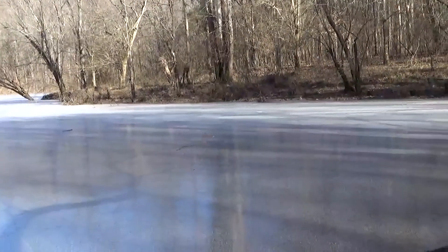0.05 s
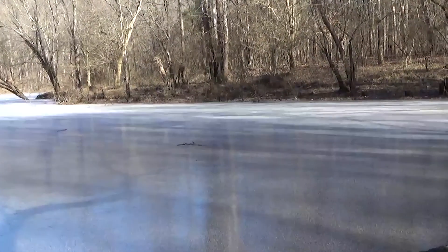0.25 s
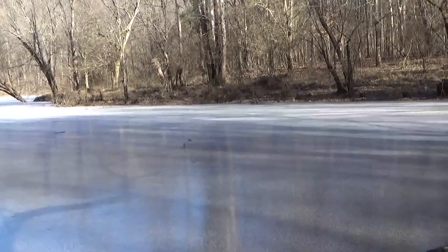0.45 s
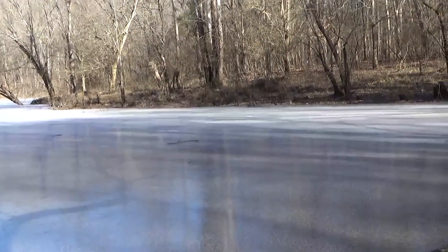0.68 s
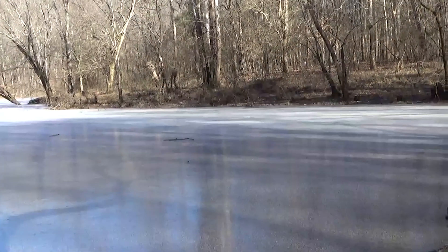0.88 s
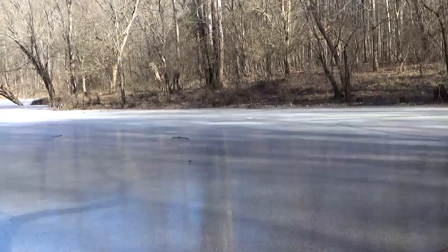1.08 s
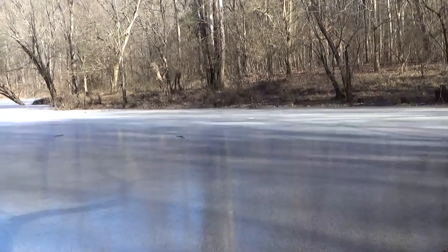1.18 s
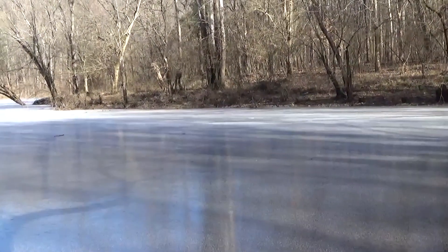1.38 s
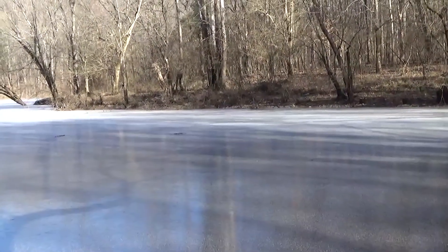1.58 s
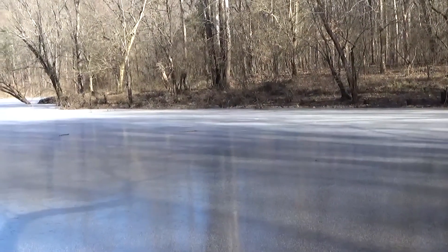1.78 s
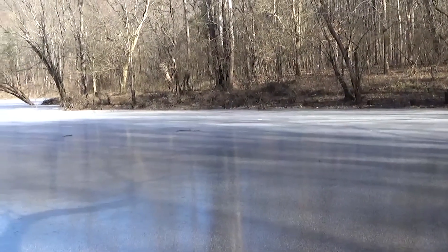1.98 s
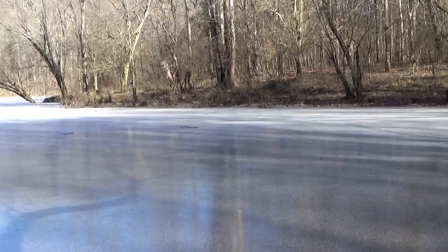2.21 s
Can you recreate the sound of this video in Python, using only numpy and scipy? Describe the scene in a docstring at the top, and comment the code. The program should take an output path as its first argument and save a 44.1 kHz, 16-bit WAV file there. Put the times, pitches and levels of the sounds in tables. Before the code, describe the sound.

Quick downward chirps ring from pond ice as a thrown stick bounces and slides.

```python
"""Light wind in bare woods. A stick thrown onto a frozen pond scrapes, ticks and skips a few times.
Each blow sends bending waves through the sheet: highs outrun lows, so a falling chirp arrives just
before the knock and tick that come through the air, and the sheet rings on at one note. The stick
rings briefly now and then. It slides away over frost with a fine icy hiss, and a faint bird whistles."""
import sys
import numpy as np
from scipy import signal
from scipy.fft import rfft, irfft, next_fast_len
from scipy.io import wavfile
from scipy.ndimage import map_coordinates

SR = 44100
rng = np.random.default_rng(int(sys.argv[2]) if len(sys.argv) > 2 else 0)


def master(y):
    """Save y as 16-bit WAV."""
    cut = np.clip(np.atleast_2d(y).T, -1, 1)
    pcm = np.round(cut * 32767)  # scale
    wavfile.write(sys.argv[1], SR, pcm.astype(np.int16))


N = 99225

# Skips: knock_s, level_db, lead_s, sweep_bend, knock_db, forerunner_db, other_end_delay_s, other_end_db
SKIPS = [(0.2501, -1.5, 0.018, 1.11, 1, -2, .027, -13), (.3740, -12, 0.018, 0.76, -5.5, -3, 0.013, -5.5),
         (0.533, -16, .022, 1.15, -46, -18, .011, -14), (0.585, -20.5, 0.027, 0.63, 4.5, -3, .010, -9),
         (0.693, -21, 0.026, 1.145, -9, -8, 0.007, -4), (.8335, -28, 0.031, 0.92, -5, -6, 0.016, -9)]
# Light blows that just set the sheet chirping: knock_s, level_db
NUDGES = [(0.057, -43.5), (.090, -43), (.136, -45.5), (0.952, -40), (1.245, -44), (1.359, -45),
          (1.640, -47.5), (1.885, -48), (1.926, -43), (2.031, -48)]
# Spectrum of chipped ice: freq_hz, gain_db
ICE_SPECTRUM = [(1000, -80), (4000, -16), (6500, -12.5), (8200, -1.5), (9500, 1.5), (11000, -2)]


def amp(db):
    return 10 ** (np.asarray(db) / 20)


def unit_rms(x):
    return x / np.sqrt(np.mean(x ** 2) + 1e-20)


def time_s():
    return np.arange(N) / SR


def freq_hz():
    """Bins of the padded spectrum."""
    return np.fft.rfftfreq(2 * next_fast_len(N * 3 // 4), 1 / SR)


def colour(points):
    """Gain per bin from (freq_hz, gain_db) points on a log axis."""
    hz, db = np.transpose(points)
    return amp(np.interp(np.log(freq_hz() + 1), np.log(hz), db))


def filtered(x, gain):
    return irfft(rfft(x, 2 * (len(gain) - 1)) * gain)[..., :N]


def noise(gain):
    """Coloured noise, rms 1."""
    return unit_rms(filtered(rng.standard_normal(N), gain))


def wobble(rate_hz):
    """Smooth random curve with knots at rate_hz."""
    return map_coordinates(rng.standard_normal(1024), [time_s() * rate_hz], mode="wrap")


def decay(start_s, t60_s, rise_s):
    age_s = np.maximum(time_s() - start_s, 0)
    return (1 - np.exp(-age_s / rise_s)) * np.exp(-np.log(1000) * age_s / t60_s)


def stereo(mid, side):
    return np.array([mid + side, mid - side])


def spread(source, side_db):
    """Two independent draws of a source as mid and side."""
    return stereo(source(), amp(side_db) * source())


def wind():
    """Light wind in the woods, wider in the treble."""
    # Wind spectrum: freq_hz, gain_db
    spectrum = [(15, -55), (25, -12.5), (69, 0.5), (134, -1), (202, -1), (247, -2), (518, -10), (979, -12),
                (1360, -13), (1710, -15), (3160, -20), (6120, -24.5), (9440, -18), (11000, -40),
                (14300, -56), (22000, -120)]
    # Stereo width: freq_hz, side_db
    width = [(50, -30), (250, -16), (1000, -4.5), (4000, -1.5), (9500, -6)]
    mid = noise(colour(spectrum))
    side = filtered(noise(colour(spectrum)), colour(width))
    return amp(-49 + 0.1 * wobble(rate_hz=6)) * stereo(mid, side)


def sheet_note(widen=1):
    """Narrow noise at the pitch where bending waves keep step with sound in air."""
    pitch_hz, half_width_hz = 1675, widen * 104
    return noise(1 / (1 + ((freq_hz() - pitch_hz) / half_width_hz) ** 4))


def sheet_murmur():
    """The sheet's faint wavering note, more diffuse than when struck."""
    level_db = -59 + 2 * wobble(rate_hz=35)
    return amp(level_db) * spread(lambda: sheet_note(widen=1.4), side_db=-13)


def grit(gain):
    """Noise with tiny fractures in it, rms about 1."""
    cracks_per_s, crack_share = 900, 0.56
    impulses = (rng.random(N) < cracks_per_s / SR) * rng.standard_normal(N)
    cracks = unit_rms(filtered(impulses, gain))
    return np.sqrt(crack_share) * cracks + np.sqrt(1 - crack_share) * noise(gain)


def slide():
    """The stick chatters over frost: a hiss and a lower rasp."""
    # Course of the slide: at_s, hiss_db, rasp_db
    levels = [(0, -47.5, -48), (.25, -49, -49), (.48, -72, -62), (.65, -75, -56), (.85, -55, -52),
              (.92, -43.5, -56), (.99, -38, -54), (1.07, -41, -47.5), (1.14, -35.5, -44), (1.23, -38, -49),
              (1.255, -41.5, -52), (1.275, -36.5, -49.5), (1.33, -43, -51.5), (1.48, -47, -55),
              (1.6, -48, -55.5), (1.72, -50.5, -54), (2.0, -50.5, -59), (2.25, -50, -77)]
    # Rasp spectrum: freq_hz, gain_db
    rasp_spectrum = [(200, -12), (600, 0.5), (1300, -6), (1700, -1), (2200, -0.5), (2750, 2.5), (3500, -2),
                     (6000, -5), (9000, -8)]
    at_s, hiss_db, rasp_db = np.transpose(levels)
    hiss = amp(np.interp(time_s(), at_s, hiss_db)) * grit(colour(ICE_SPECTRUM))
    rasp = amp(np.interp(time_s(), at_s, rasp_db)) * grit(colour(rasp_spectrum))
    chatter_db = 2.5 * wobble(rate_hz=70)
    return amp(chatter_db) * (hiss + rasp)


def contacts():
    """Gritty ticks and scuffs of wood on ice, heard straight through the air."""
    # Sharp contacts: start_s, level_db, t60_s, wood_db
    ticks = [(0.0443, -41, 0.019, -1), (0.0786, -23, 0.0031, -33), (0.0886, -26, 0.003, -5.5),
             (.1218, -36.5, 0.014, -4), (.2490, -15.5, 0.0046, -4.5), (0.2503, -34.5, 0.0087, 0),
             (0.2996, -19, 0.0036, -17), (0.3734, -32.5, 0.012, -8), (0.4743, -30, 0.0027, -15),
             (.5290, -43.5, 0.017, 2), (0.5811, -30.5, 0.007, -7.5), (0.6899, -37.5, 0.012, -2),
             (0.746, -46.5, 0.0078, 8), (.8110, -28, 0.015, -16), (0.8252, -24, 0.0037, -11),
             (0.834, -36.5, 0.01, -2.5), (0.8731, -32.5, 0.011, -16), (0.8797, -30.5, 0.011, -27),
             (.9030, -32, 0.014, -21), (0.908, -31, 0.0067, -21), (0.9372, -30, 0.011, -28),
             (1.232, -38.5, 0.012, 3.5), (1.550, -51, 0.014, 4.5), (1.880, -52, 0.0094, 10.5),
             (2.160, -55, 0.036, 7)]
    # Short scuffs: centre_s, level_db, width_s, wood_db
    scuffs = [(0.055, -61, 0.0067, 13.5), (0.131, -29.5, 0.0091, -10), (0.201, -48, 0.0067, -3.5),
              (0.39, -53, 0.024, 7), (0.457, -47.5, 0.014, 6.5), (0.539, -50.5, 0.0082, 1.5),
              (0.705, -40, 0.0093, 4), (0.757, -51.5, 0.0078, 7), (1.027, -33, 0.011, -12),
              (2.207, -59, 0.036, 9), (2.234, -54.5, 0.014, 6)]
    # Duller spectrum of the wood: freq_hz, gain_db
    wood_spectrum = [(200, -44), (700, -20), (2000, 0), (3300, 5), (4200, 7.5), (5100, 2), (6200, 6),
                     (7500, 3), (9000, -5), (11000, -6)]
    envelopes = [(2 * amp(level_db) * decay(start_s, t60_s, rise_s=0.00044), wood_db)
                 for start_s, level_db, t60_s, wood_db in ticks]
    envelopes += [(amp(level_db) * np.exp(-2 * ((time_s() - centre_s) / width_s) ** 2), wood_db)
                  for centre_s, level_db, width_s, wood_db in scuffs]
    ice, wood = noise(colour(ICE_SPECTRUM)), noise(colour(wood_spectrum))
    crunch_db = 2.2 * wobble(rate_hz=1500)
    return amp(crunch_db) * sum(envelope * (ice + amp(wood_db) * wood) for envelope, wood_db in envelopes)


def dispersed(gain, arrival_s):
    """A pulse whose frequencies each arrive at their own time."""
    return irfft(gain * np.exp(-2j * np.pi * np.cumsum(arrival_s) * freq_hz()[1]))[:N]


def chirp(knock_s, lead_s, bend, knock_db):
    """Bending waves arrive as a falling sweep that ends in a low knock."""
    # Chirp spectrum: freq_hz, gain_db
    spectrum = [(100, -55), (300, -28), (480, -23), (660, -11), (820, -12.5), (1000, -20), (1200, -13),
                (1420, -4.5), (1750, -1.5), (2000, -3), (2250, -6.5), (2420, -10), (2600, -11), (2850, -24),
                (3600, -50), (6000, -100)]
    knock_hz, lead_hz = 1419.5, 2671  # all below knock_hz lands together; lead_hz comes lead_s earlier
    height = np.clip((freq_hz() - knock_hz) / (lead_hz - knock_hz), 0, 1.15)
    lows = 1 / (1 + (freq_hz() / 1200) ** 6)
    return dispersed(colour(spectrum) * amp(31.5 + knock_db * lows), knock_s - lead_s * height ** bend)


def uneven_ice(wave, rough_db):
    """Uneven ice gives a wave many close paths, a little different at each ear."""
    t60_s, side_db = 0.049, -13.5
    delay_s = np.arange(SR // 16) / SR
    paths = rng.standard_normal((2, len(delay_s))) * np.exp(-np.log(1000) * delay_s / t60_s)
    mid, side = signal.oaconvolve(wave[None], paths / np.linalg.norm(paths[0]), axes=1)[:, :N]
    return stereo(wave + amp(rough_db) * mid, amp(side_db) * side)


def nudges():
    """Light blows raise faint, blurred chirps."""
    return sum(amp(level_db) * uneven_ice(chirp(knock_s, lead_s=0.026, bend=0.96, knock_db=-2), rough_db=8)
               for knock_s, level_db in NUDGES)


def sheet_tail():
    """The sheet holds its note after each blow; after skips the banks also send waves back."""
    # Spectrum of the scattered waves: freq_hz, gain_db
    scatter_spectrum = [(100, -25.5), (270, -5.5), (450, -7.5), (750, -5.5), (1100, -8.5), (1600, -3.5),
                        (2200, -6.5), (2700, -24), (3200, -24.5), (6000, -33.5)]

    def fading(blows, t60_s, rise_s):
        return np.sqrt(sum((amp(db) * decay(knock_s, t60_s, rise_s)) ** 2 for knock_s, db, *_ in blows))

    early = amp(-19.5) * fading(SKIPS, t60_s=0.071, rise_s=0.0032)
    late = amp(-29.5) * fading(SKIPS, t60_s=0.82, rise_s=0.0042)
    skip_ring = amp(-22.5) * fading(SKIPS, t60_s=0.45, rise_s=0.036)
    nudge_ring = amp(-4) * fading(NUDGES, t60_s=0.07, rise_s=0.003)
    return (skip_ring + nudge_ring) * sheet_note() + (early + late) * noise(colour(scatter_spectrum))


def forerunner(knock_s):
    """The fastest bending wave: speed grows with the root of frequency."""
    # Forerunner spectrum: freq_hz, gain_db
    spectrum = [(150, -54), (500, -12.5), (800, -3.5), (1500, 4.5), (2100, -0.5), (2650, -4), (3100, -13),
                (3800, -52), (6000, -100)]
    travel_s, with_knock_hz = 0.040, 593.4
    lag_s = travel_s * (np.sqrt(with_knock_hz / np.maximum(freq_hz(), 100)) - 1)
    return dispersed(colour(spectrum) * amp(19.5), knock_s + lag_s)


def skips():
    """Both ends of the stick strike the sheet at each skip; lighter blows are more blurred."""
    out = 0
    for knock_s, level_db, lead_s, bend, knock_db, forerunner_db, delay_s, other_end_db in SKIPS:
        first_end = chirp(knock_s, lead_s, bend, knock_db) + amp(forerunner_db) * forerunner(knock_s)
        other_end = amp(other_end_db) * chirp(knock_s + delay_s, lead_s, bend, knock_db=-17)
        out += amp(level_db) * uneven_ice(first_end + other_end, rough_db=-6 - 0.2429 * level_db)
    return out


def stick_ring():
    """The stick rings briefly around the first three skips and three times, faintly, as it slides."""
    # Rings of the stick: start_s, level_db
    rings = [(0.251, -15.5), (0.365, -15.5), (0.508, -21.5), (1.103, -34), (1.142, -32.5), (1.22, -33.5)]
    pitch_hz = 2520
    out = np.zeros(N)
    for start_s, level_db in rings:
        phase_rad = 2 * np.pi * pitch_hz * (time_s() - start_s) + 0.66 * wobble(rate_hz=150)
        out += amp(level_db) * decay(start_s, t60_s=0.049, rise_s=0.0066) * np.sin(phase_rad)
    return out


def bird():
    """Thin rising whistles from the woods."""
    # Whistles: start_s, length_s, start_hz, end_hz, level_db
    whistles = [(1.408, 0.058, 4120, 5040, -58), (1.615, .045, 5220, 5350, -59),
                (1.67, 0.054, 3960, 4250, -51.5), (1.730, .06, 4410, 4580, -56.5)]
    out = np.zeros(N)
    for start_s, length_s, start_hz, end_hz, level_db in whistles:
        progress = np.clip((time_s() - start_s) / length_s, 0, 1)
        envelope = np.sqrt(np.abs(np.sin(np.pi * progress)))
        pitch_hz = start_hz + (end_hz - start_hz) * progress
        out += amp(level_db) * envelope * np.sin(2 * np.pi * np.cumsum(pitch_hz) / SR)
    return out


def scene():
    sheet = nudges() + skips() + spread(sheet_tail, side_db=-11.5)
    stick = stick_ring() + spread(contacts, side_db=-10) + spread(slide, side_db=-16.5)
    return sheet + stick + wind() + sheet_murmur() + bird()


def record(dry):
    """Brick-wall low-pass."""
    cutoff_hz = 11080
    return filtered(dry, 1.0 * (freq_hz() < cutoff_hz))


dry = scene()
out = record(dry)
master(out)
```